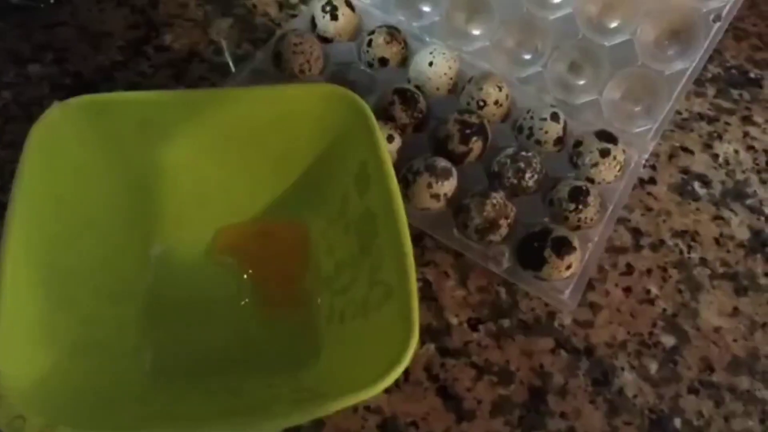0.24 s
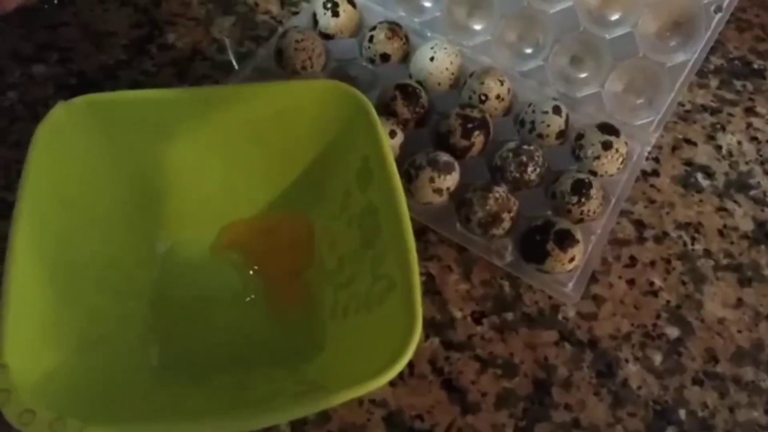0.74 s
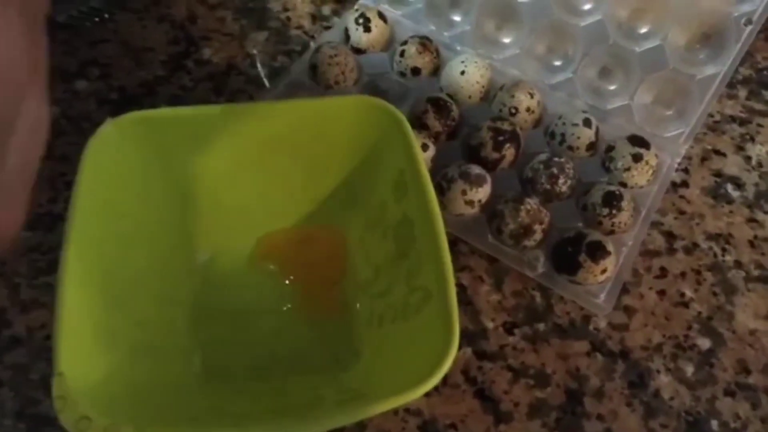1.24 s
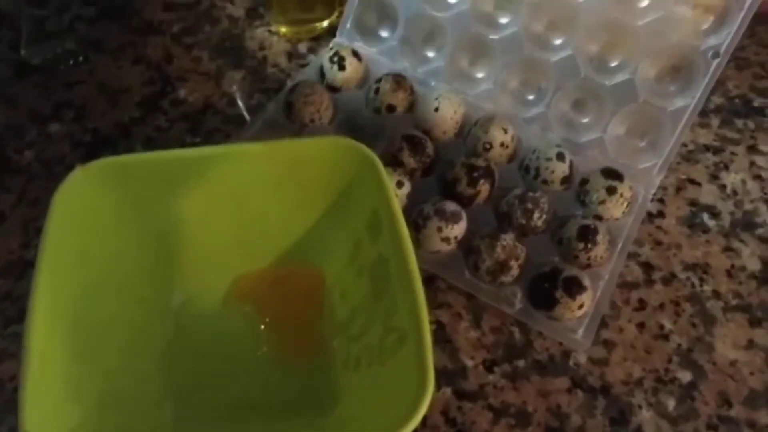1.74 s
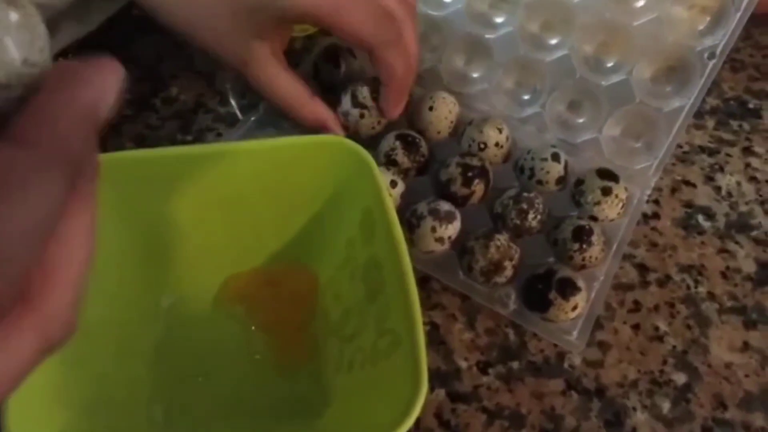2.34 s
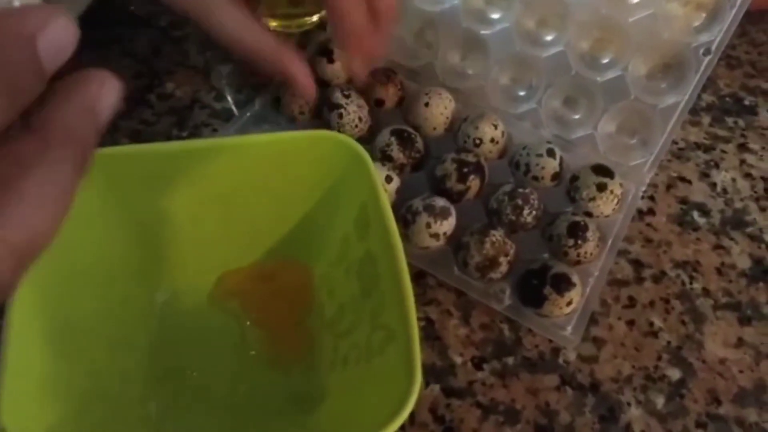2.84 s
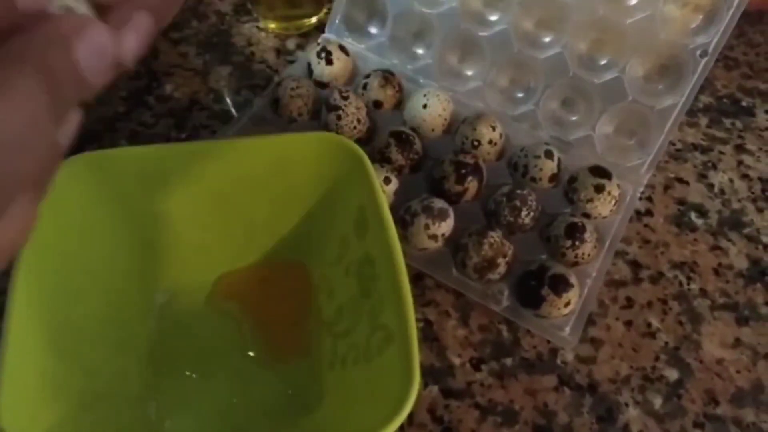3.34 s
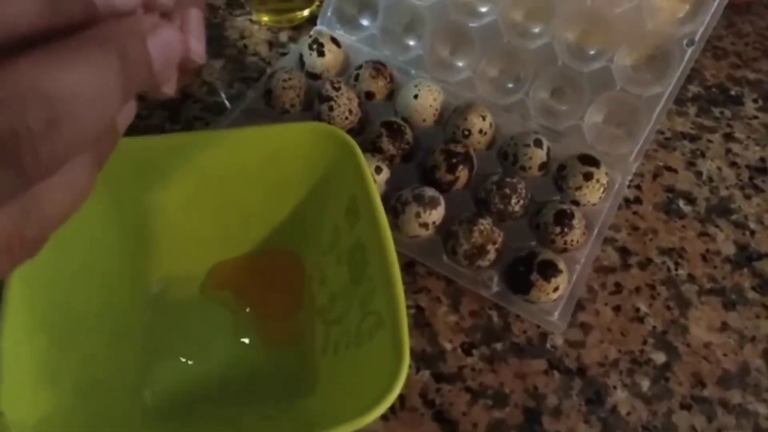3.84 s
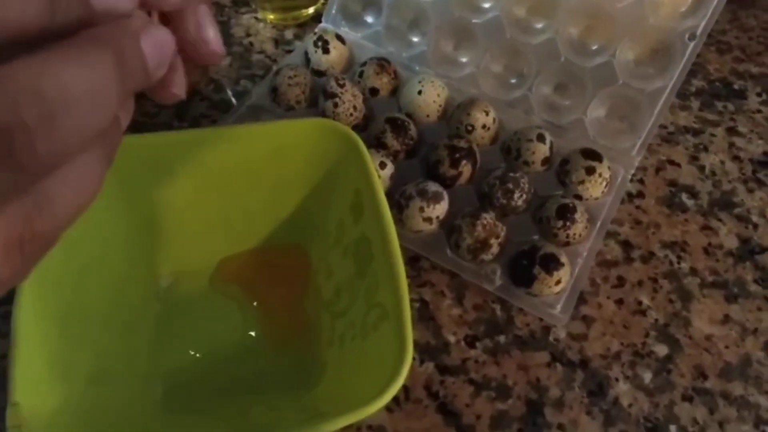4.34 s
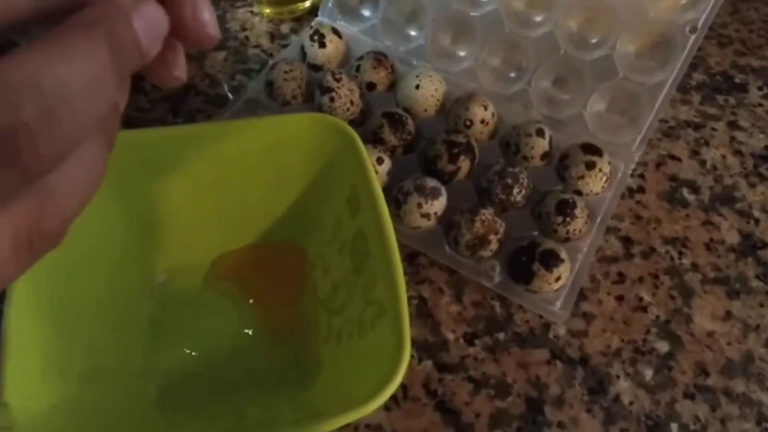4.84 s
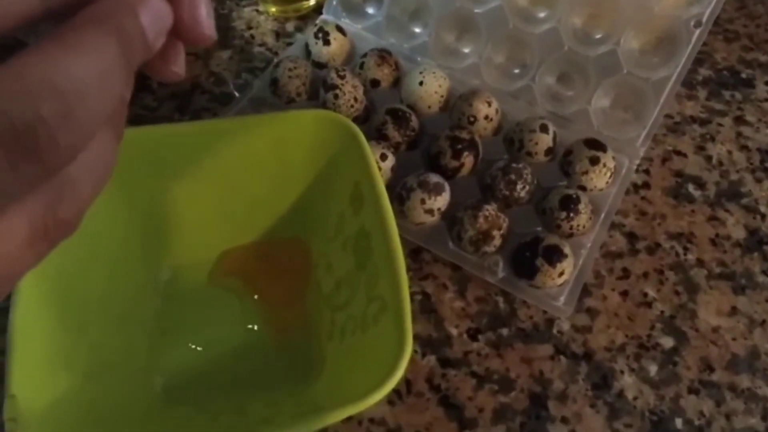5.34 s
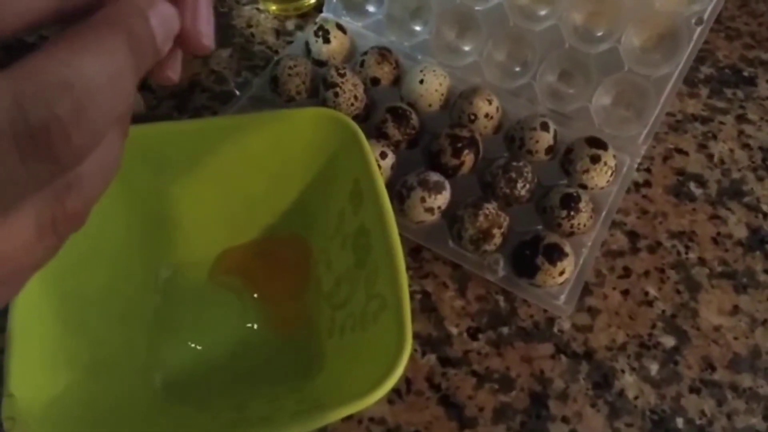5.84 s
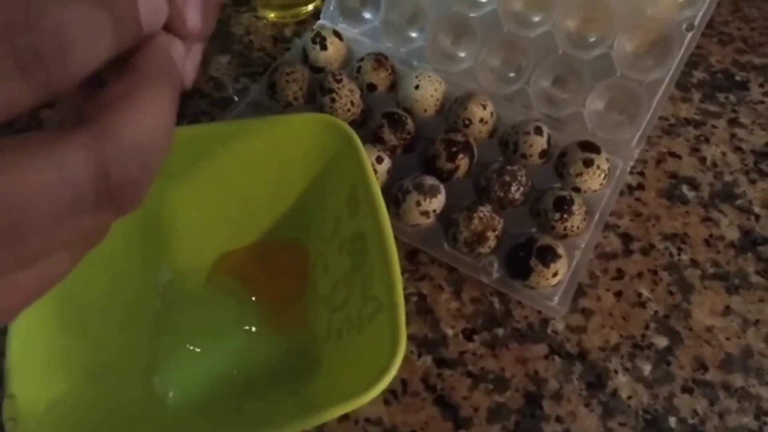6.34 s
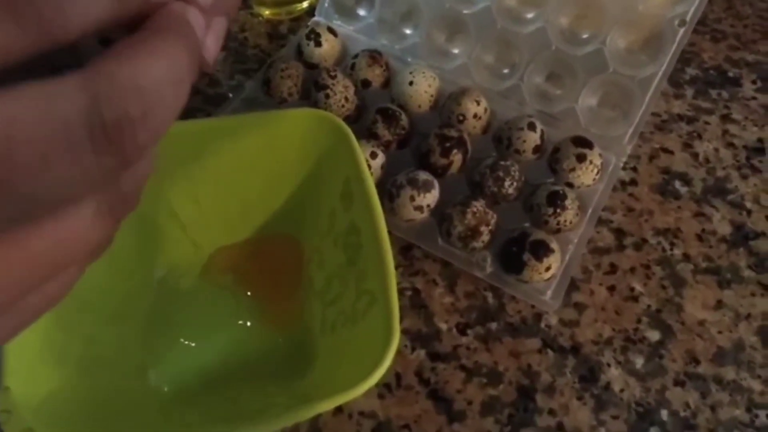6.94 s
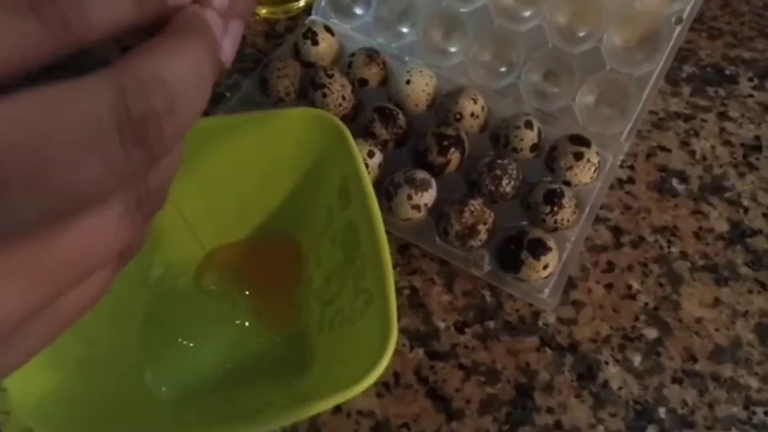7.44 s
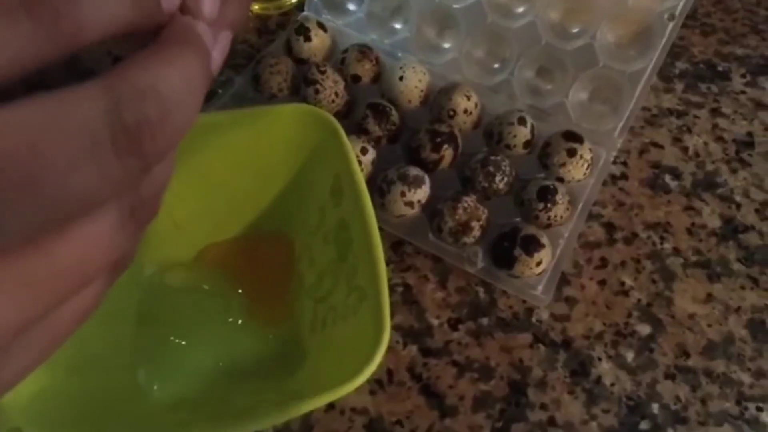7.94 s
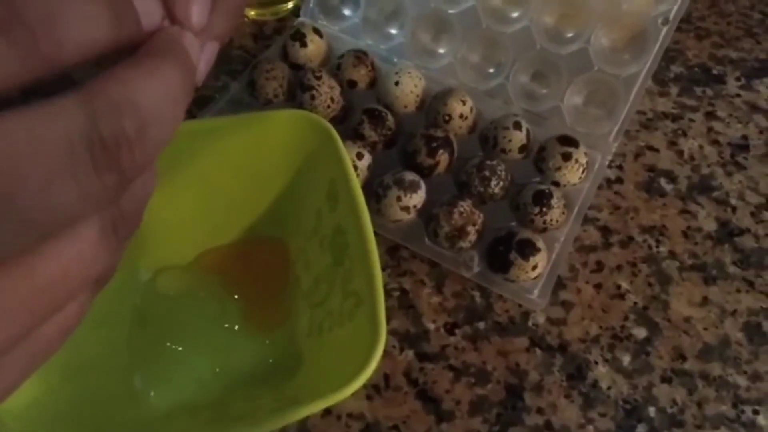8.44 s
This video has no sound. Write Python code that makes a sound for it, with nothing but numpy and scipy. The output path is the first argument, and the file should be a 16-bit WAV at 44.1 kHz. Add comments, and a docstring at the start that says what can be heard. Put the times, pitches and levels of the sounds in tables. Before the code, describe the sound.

Close plastic tray clatter and brittle eggshell ticks from hand-cracked little eggs, with caged birds twittering and chirping across a hard-walled kitchen.

```python
"""A hard-walled kitchen: small eggs are picked from a plastic tray and cracked by hand over a bowl.
Parakeets chatter off in the room: gliding three-partial notes in dense echo, over flickering twitter hiss.
Shells tick close by as short noise bursts; tray knocks drive resonant modes and noise bands.
Hands rumble on the microphone as low noise and rustle; a thin whistle, tonal swells, mains hum and
a noise floor lie underneath. A noise suppressor works on the whole."""
import sys
import numpy as np
from scipy import signal
from scipy.fft import rfft, irfft, next_fast_len
from scipy.io import wavfile
from scipy.ndimage import uniform_filter1d

SR = 44100
rng = np.random.default_rng(int(sys.argv[2]) if len(sys.argv) > 2 else 0)


def put_to_file(sound):
    """Save the sound as 16-bit audio at rate SR, in the file named by the first command-line argument."""
    columns = np.atleast_2d(sound).T  # one column per channel
    safe = np.clip(columns, -1, 1)
    whole_steps = np.round(safe * 32767)
    wavfile.write(sys.argv[1], SR, whole_steps.astype(np.int16))


N = 383669


def amp(db):
    """Decibels to gain."""
    return 10 ** (np.asarray(db) / 20)


def rms_one(x):
    """Scale to unit rms."""
    return x / np.sqrt(np.mean(x ** 2) + 1e-20)


def in_time(rows):
    """Table columns as sample-rate curves."""
    time_s, *columns = np.transpose(rows)
    return [np.interp(np.arange(N) / SR, time_s, column) for column in columns]


def at_hz(points, hz):
    """Read a spectrum on a log-frequency axis."""
    points_hz, values = np.transpose(points)
    return np.interp(np.log(hz + 1), np.log(points_hz), values)


def band(x, low_hz, high_hz, order=2):
    """Butterworth band-pass."""
    sos = signal.butter(order, [low_hz, min(high_hz, 20000)], "band", fs=SR, output="sos")
    return signal.sosfilt(sos, x)


def noise():
    """White noise over the whole scene."""
    return rng.standard_normal(N)


def drift(rate_hz):
    """Random wander, rms 1: noise through a double pole at rate_hz."""
    r = np.exp(-2 * np.pi * rate_hz / SR)
    wander = signal.lfilter([1], [1, -2 * r, r * r], rng.standard_normal(N + SR))
    return rms_one(wander[SR:])


def coloured(spectrum):
    """Steady noise with the given spectrum, rms 1."""
    size = next_fast_len(N)
    gain = amp(at_hz(spectrum, np.fft.rfftfreq(size, 1 / SR)))
    return rms_one(irfft(rfft(rng.standard_normal(size)) * gain, size)[:N])


def ring(drive, hz, t60_s):
    """Two-pole resonator: a unit click sets a decaying sine of height 1 ringing."""
    r, w = amp(-60 / (t60_s * SR)), 2 * np.pi * hz / SR
    return signal.lfilter([0, np.sin(w)], [1, -2 * r * np.cos(w), r * r], drive + 1e-18)


def add(out, time_s, sound):
    """Mix a short sound in at time_s."""
    at = round(time_s * SR)
    out[at:at + len(sound)] += sound[:N - at]


# Room decay: (frequency [Hz], t60 [s])
ROOM_DECAY = [(200, 0.15), (2500, 0.53), (5000, 0.46), (9000, 0.42), (13500, 0.39), (16000, 0.045)]


def room(x):
    """Diffuse echo: noise that dies band by band, unit energy."""
    t, edges_hz = np.arange(SR) / SR, np.geomspace(100, 18000, 13)
    tail = np.zeros(SR)
    for low_hz, high_hz in zip(edges_hz, edges_hz[1:]):
        t60_s = at_hz(ROOM_DECAY, np.sqrt(low_hz * high_hz))
        tail += band(rng.standard_normal(SR), low_hz, high_hz) * amp(-60 * t / t60_s)
    tail *= np.minimum(t / 0.0014, 1)   # first reflections need time to arrive
    return signal.fftconvolve(x, tail / np.sqrt(np.sum(tail ** 2)))[:N]


# Distant twitter: (time [s], level [dB], brightness [dB/octave])
FLOCK_LEVEL = [(0, -57.5, -1.5), (.45, -47, -5), (.62, -60.5, -8.5), (.69, -62, 1), (.76, -58.5, 1),
               (.85, -51.5, -11.5), (1.6, -47, 0.5), (1.85, -44, -1.3), (2.08, -51, -6.5),
               (2.5, -45.5, -5.5), (2.72, -47.5, -4), (2.95, -52, -7), (3.2, -49, -6), (3.5, -48.5, -1.5),
               (3.7, -96, 5), (3.8, -75, 11), (4.2, -43, -10.5), (4.9, -46.5, 0), (5.06, -94, 0.5),
               (6.9, -77, -7.5), (7.0, -51, -0.5), (8.1, -42.5, 0), (8.27, -51.5, -1), (8.7, -64, 26)]
# Twitter spectrum: (frequency [Hz], relative density [dB per Hz])
TWITTER_SPECTRUM = [(590, -34.5), (1000, -48), (1380, -14), (1830, -7), (2090, -4), (2440, 2), (2750, -1),
                    (3790, -2.5), (5380, 4.5), (6890, -7), (9000, -13.5), (11700, -72.5), (19800, -120)]


def flock():
    """Distant twitter blurred to hiss: flickering log-spaced bands, tilted about 3500 Hz by brightness."""
    level_db, bright_db_per_oct = in_time(FLOCK_LEVEL)
    hiss, edges_hz = coloured(TWITTER_SPECTRUM), np.geomspace(1100, 7300, 15)
    twitter = np.zeros(N)
    for low_hz, high_hz in zip(edges_hz, edges_hz[1:]):
        tilt_db = bright_db_per_oct * np.log2(low_hz / 3500)
        twitter += amp(1.3 * drift(7.6) + tilt_db) * band(hiss, low_hz, high_hz)
    air = amp(-26.5 + 3 * drift(8)) * rms_one(band(noise(), 12000, 14000, order=3))
    return amp(level_db) * (twitter + air)


# Whistle: (time [s], frequency [Hz], level [dB])
WHISTLE_PATH = [(0, 1047, -61), (.04, 1027, -74), (.085, 1167, -69), (.1, 1305, -62), (.14, 1330, -74),
                (.16, 1240, -60), (.25, 1222, -66), (.3, 1324, -83), (.4, 1304, -83)]
WHISTLE_ROOM_DB = 0.5


def whistle():
    """A faint sine that steps up and fades; fast pitch jitter makes it breathy."""
    hz, level_db = in_time(WHISTLE_PATH)
    fade = np.clip((WHISTLE_PATH[-1][0] - np.arange(N) / SR) / 0.021, 0, 1)
    jittered_hz = hz * (1 + 0.025 * drift(300))
    tone = np.sin(2 * np.pi * np.cumsum(jittered_hz) / SR)
    return amp(level_db + 2 * drift(30)) * tone * fade


# Grips on the microphone body: (time [s], hold [s], thump level [dB], rustle level [dB])
HAND_GRIPS = [(.48, 0.033, -76, -80), (0.869, 0.08, -58, -63), (1.622, 0.018, -81.5, -69.5),
              (1.9, 0.025, -64, -50.5), (2.406, 0.14, -67, -55.5), (3.388, 0.0077, -57, -76),
              (4.452, 0.18, -53, -59), (5.3, 0.015, -66.5, -80), (5.755, 0.14, -65, -72),
              (6.776, 0.021, -77, -83.5), (7, 0.35, -72, -90), (7.906, 0.057, -70, -80),
              (8.274, 0.24, -69, -74)]
# Low drone level: (time [s], level [dB])
DRONE_CURVE = [(0, -99), (1.02, -79.5), (2.32, -92), (2.52, -65), (2.85, -96.5), (5.6, -88.5), (5.82, -64),
               (6.08, -93), (6.6, -84), (7.0, -63), (7.36, -62.5), (7.73, -56), (7.92, -63.5),
               (8.31, -62.5), (8.53, -78), (8.7, -64.5)]
# Drone noise bands: (centre [Hz], width [Hz], relative level [dB])
DRONE_BANDS = [(102, 13, -6), (137, 12, 1.5), (179.5, 16, 0.5), (251.2, 35, -10.5)]
GRIP_RISE_DB_PER_S, GRIP_FALL_DB_PER_S = 302.5, 134
THUMP_REST_DB, RUSTLE_REST_DB = -82.5, -83


def hands():
    """Each grip rises, holds and falls as low thump and patchy rustle noise; a wavering drone runs beside."""
    t, thump_db, rustle_db = np.arange(N) / SR, THUMP_REST_DB, RUSTLE_REST_DB
    for time_s, hold_s, grip_thump_db, grip_rustle_db in HAND_GRIPS:
        rise_db = GRIP_RISE_DB_PER_S * np.maximum(time_s - t, 0)
        fall_db = GRIP_FALL_DB_PER_S * np.maximum(t - time_s - hold_s, 0)
        thump_db = np.maximum(thump_db, grip_thump_db - rise_db - fall_db)
        rustle_db = np.maximum(rustle_db, grip_rustle_db - rise_db - fall_db)
    thump = amp(thump_db + 0.5 * drift(13)) * rms_one(band(noise(), 36, 110))

    drone_db, = in_time(DRONE_CURVE)
    drone = np.zeros(N)
    for hz, width_hz, db in DRONE_BANDS:
        drone += amp(db + 2.5 * drift(2.3)) * band(noise(), hz - width_hz / 2, hz + width_hz / 2)

    edges_hz = np.geomspace(340, 1500, 11)
    rustle = np.zeros(N)
    for low_hz, high_hz in zip(edges_hz, edges_hz[1:]):
        rustle += amp(5 * drift(13)) * band(noise(), low_hz, high_hz)
    return thump + amp(drone_db) * rms_one(drone) + amp(rustle_db) * rms_one(rustle)


# Mains overtone: (frequency [Hz], level [dB rms])
HUM_TONES = [(300, -76)]


def hum():
    """A mains overtone: a sine whose level barely wavers."""
    t, out = np.arange(N) / SR, np.zeros(N)
    for hz, level_db in HUM_TONES:
        out += amp(level_db + 0.4 * drift(3)) * np.sqrt(2) * np.sin(2 * np.pi * hz * t)
    return out


# Noise floor spectrum: (frequency [Hz], relative density [dB per Hz])
FLOOR_SPECTRUM = [(30, -14), (100, -15), (250, -9.5), (500, -15.5), (2000, -21), (6000, -23.5),
                  (14000, -17.5), (16000, -22)]
FLOOR_RMS_DB = -77.5


def noise_floor():
    """Steady coloured noise."""
    return amp(FLOOR_RMS_DB) * coloured(FLOOR_SPECTRUM)


# Faint tonal swells: (time [s], length [s], centre [Hz], level [dB])
TONE_SWELLS = [(0.148, 0.28, 357, -69.5), (1.193, 0.25, 777, -70.5), (2.712, 0.14, 1357, -57.5),
               (2.764, 0.17, 1620, -61), (5.745, 0.33, 350, -63.5), (5.749, 0.31, 252, -60.5),
               (2.409, 0.19, 231, -62), (5.852, 0.16, 1360, -65.5), (6.256, 0.47, 598, -78),
               (6.286, 0.25, 348, -75.5), (6.676, 0.18, 900, -76), (6.664, 0.23, 352, -72),
               (6.972, 0.34, 716, -75.5), (7.812, 0.15, 985, -71), (7.98, 0.18, 380, -68),
               (8.2, 0.2, 710, -66.5), (8.3, 0.098, 476, -70), (8.497, 0.19, 614, -74)]


def swells():
    """Narrow noise bands that fade in and out."""
    out = np.zeros(N)
    for time_s, length_s, hz, level_db in TONE_SWELLS:
        settled = band(rng.standard_normal(SR), 0.95 * hz, 1.05 * hz)
        tone = settled[SR - round(length_s * SR):]
        add(out, time_s, amp(level_db) * rms_one(tone) * np.sqrt(np.hanning(len(tone))))
    return out


# Parakeet notes: (time [s], length [s], start [Hz], end [Hz], rasp [0-1],
#                  fundamental level [dB], octave level [dB])
BIRD_NOTES = [(0.245, 0.061, 2707, 2593, 0.13, -56, -47), (0.382, 0.078, 3040, 2810, 0.08, -65, -51.5),
              (0.388, 0.057, 4000, 3960, 0.09, -53, -72), (0.706, 0.077, 4020, 3670, 0.09, -54, -103),
              (0.773, 0.09, 3320, 2300, 0.19, -54.5, -88), (0.962, 0.073, 3950, 3920, 0.07, -55, -75),
              (1.024, 0.05, 4550, 4690, 0.08, -45, -73), (1.088, 0.073, 4343, 4060, 0.06, -41.5, -57.5),
              (1.23, 0.085, 2630, 2630, 0.08, -71, -58.5), (1.392, 0.028, 4080, 3840, 0, -52.5, -87),
              (2.529, 0.049, 3090, 2954, 0.07, -57.5, -52.5), (2.953, 0.053, 3650, 3580, 0.09, -51, -68),
              (3.023, 0.085, 2393, 2293, 0.11, -54, -69), (3.077, 0.1, 2910, 2850, 0.1, -55.5, -43.5),
              (3.087, 0.093, 3917, 3590, 0.19, -47, -58), (3.277, 0.046, 4120, 4230, 0.02, -47, -64),
              (3.3, 0.054, 2458, 2400, 0.09, -52.5, -80), (3.321, 0.11, 3265, 3200, 0.07, -54.5, -72),
              (3.409, 0.065, 4530, 4450, 0.09, -48.5, -89), (3.503, 0.065, 3210, 3335, 0.08, -52, -83),
              (3.515, 0.052, 2730, 2650, 0.04, -56.5, -84), (3.574, 0.07, 3593, 3493, 0.06, -53, -96),
              (3.63, 0.026, 2170, 2140, 0, -56, -92), (3.723, 0.065, 4290, 3964, 0.1, -49.5, -75),
              (3.739, 0.084, 2250, 2110, 0.06, -55, -78), (3.781, 0.067, 3280, 3220, 0.05, -47.5, -59),
              (3.81, 0.046, 2846, 2636, 0.04, -46.5, -68), (3.855, 0.075, 2706, 2802, 0.23, -50, -46.5),
              (4.16, 0.082, 2927, 3260, 0.13, -48, -31), (4.274, 0.065, 2943, 2714, 0.22, -61, -31.5),
              (4.38, 0.079, 2170, 2183, 0.05, -49, -34.5), (4.443, 0.042, 2240, 2223, 0.21, -55, -27),
              (4.57, 0.16, 2288, 2167, 0.15, -47, -34), (5.082, 0.051, 4710, 4550, 0, -52.5, -78),
              (5.109, 0.043, 3640, 3170, 0.15, -53, -81), (5.079, 0.056, 4300, 4190, 0.06, -53, -76),
              (5.14, 0.076, 3216, 3110, 0.04, -50.5, -86), (5.17, 0.06, 2558, 2376, 0.07, -50.5, -81),
              (5.614, 0.095, 2846, 2786, 0.19, -53.5, -42.5), (5.724, 0.079, 4240, 4100, 0.11, -45.5, -67),
              (5.797, 0.0813, 2690, 3190, 0.16, -43, -52), (5.747, 0.052, 2103, 2030, 0.15, -48, -67),
              (5.836, 0.071, 2350, 2462, 0.18, -55.5, -34), (6.172, 0.08, 2710, 2310, 0.12, -53, -50),
              (6.224, 0.049, 3318, 2952, 0.15, -43.5, -58.5), (6.735, 0.039, 2585, 2475, 0.07, -61, -72),
              (6.847, 0.015, 2080, 2060, 0, -63.5, -75), (6.918, 0.079, 2583, 2430, 0.09, -53, -47.5),
              (7.015, 0.079, 2880, 2850, 0.11, -47.5, -52), (7.045, 0.067, 2002, 1874, 0.09, -47, -64),
              (7.124, 0.072, 2490, 2034, 0.13, -42, -51), (7.191, 0.1, 3162, 3300, 0.06, -48, -69),
              (7.277, 0.082, 3500, 3315, 0.02, -52, -79), (7.376, 0.05, 2650, 2670, 0.02, -46.5, -41),
              (8.294, 0.067, 2416, 2896, 0.08, -72, -35), (8.302, 0.056, 2726, 2693, 0, -46.5, -28.5),
              (8.362, 0.11, 2734, 2506, 0.16, -50, -32), (8.472, 0.088, 2830, 2856, 0.14, -49.5, -29.5),
              (8.565, 0.061, 2540, 2430, 0.09, -51, -32.5), (8.599, 0.087, 2826, 2812, 0.03, -44.5, -31.5)]
BIRD_DIRECT_DB, BIRD_ROOM_DB = 1.5, 4.5
THIRD_DB = -15.5   # third partial re octave
NOTE_ATTACK_S, NOTE_RELEASE_S = 0.012, 0.032
BREATH_DB, BIRD_AIR_DB = -15, -28.5   # re call loudness


def parakeets():
    """Gliding notes of three partials; fast pitch flutter spreads them into a rasp; strong echo, hiss on top."""
    calls, flutter = np.zeros(N), drift(426)
    for time_s, length_s, start_hz, end_hz, rasp, first_db, octave_db in BIRD_NOTES:
        at = round(time_s * SR)
        t = np.arange(min(round(length_s * SR), N - at)) / SR
        glide_hz = np.interp(t, [0, length_s], [start_hz, end_hz])
        phase = 2 * np.pi * np.cumsum(glide_hz * (1 + rasp * flutter[at:at + len(t)])) / SR
        partials_db = [first_db, octave_db, octave_db + THIRD_DB]
        tone = sum(amp(db) * np.sin(k * phase) for k, db in enumerate(partials_db, 1))
        envelope = np.minimum(t / NOTE_ATTACK_S, (length_s - t) / NOTE_RELEASE_S)
        add(calls, time_s, tone * np.clip(envelope, 0, 1))
    calls = band(calls, 1934, 9400, order=4)
    heard = amp(BIRD_DIRECT_DB) * calls + amp(BIRD_ROOM_DB) * room(calls)

    loudness = np.sqrt(np.abs(uniform_filter1d(heard ** 2, size=800)))
    edges_hz = np.geomspace(8800, 14300, 9)
    air = np.zeros(N)
    for low_hz, high_hz in zip(edges_hz, edges_hz[1:]):
        air += amp(4.5 * drift(15)) * band(noise(), low_hz, high_hz)
    breath = amp(BREATH_DB) * coloured(TWITTER_SPECTRUM)
    return heard + loudness * (amp(BIRD_AIR_DB) * rms_one(air) + breath)


# Tray and bowl knocks: (time [s], overall level [dB], ring [dB], crunch [dB], snap [dB], treble [dB],
#                        body [dB], body frequency [Hz], rattle t60 [s])
TRAY_KNOCKS = [(0.26, -30.5, -22, -32, -0.5, -25, -19, 680, 0.021),
               (0.8576, -8.5, -23.5, 1, 6.5, 6, -30, 245, 0.041),
               (0.874, -14.5, -28, -4, 3.5, 0, -36, 250, 0.012),
               (0.923, -28.5, -19, -8, -21, -24, -11, 2200, 0.013),
               (0.996, -38.5, -18, 3, 1, -1, -39, 600, 0.032), (1.569, -41, -6, 0, 8, 6, -27, 696, 0.031),
               (1.854, -21, -15.5, -4.5, -6, -18, -8.5, 733, 0.027),
               (1.864, -27.5, -15.5, -5, -1, -11, -30, 248, 0.05),
               (1.891, -16, -15.5, -6, -1.5, -20.5, -15, 570, 0.02),
               (1.9, -25, -19, -3.5, -1, -9.5, -20, 620, 0.1),
               (1.912, -29.5, -13, -1.5, -6, -15, -16, 2000, .06),
               (1.924, -32.5, -20, -2.5, -0.5, -6.5, -16, 250, 0.11),
               (1.951, -31.5, -12.5, -0.5, -5, -14, -24, 560, 0.05),
               (1.996, -29, -12.5, -6, -10, -47, -11.5, 1090, 0.02),
               (2.055, -43, -12, -3, -8.5, -40, -25.5, 700, 0.05),
               (2.086, -42, -15, -4.5, -8, -40, -36.5, 696, 0.02),
               (2.11, -35, -17, -3.5, -8.5, -39.5, -15.5, 770, 0.06),
               (2.119, -36, -9.5, -4, -15, -40.5, -11, 2150, 0.07),
               (2.242, -10.5, -17.5, -7, -17.5, -26, -23.5, 760, 0.024),
               (2.326, -33, -13, -3.5, -5, -34, -10, 710, 0.22),
               (2.338, -26.5, -15.5, -0.5, -4, -34.5, -17, 720, .1),
               (2.346, -15, -12, -4, -13, -28.5, -14.5, 670, 0.064),
               (2.353, -20, -16, -2, -2, -18, -12.5, 2140, 0.045),
               (2.373, -17, -7, -4.5, -4.5, -25, -7.5, 1620, 0.05),
               (2.377, -9.5, -19, -5, -3, -9.5, -13.5, 608, 0.068),
               (2.383, -13, -18, -11.5, -11, -33, -13.5, 570, 0.044),
               (2.388, -17, -11, -6.5, -9.5, -24.5, -14.5, 230, 0.05),
               (2.403, -27.5, -11.5, 1.5, 2.5, -15, -14, 800, 0.14),
               (2.425, -30.5, -10.5, -9, -10, -11.5, -11.5, 480, 0.23)]
# Tray modes: (frequency [Hz], level [dB], t60 [s])
TRAY_MODES = [(738, 1, 0.047), (1060, -0.5, .03), (1620, -0.5, 0.04), (2186, 3.5, 0.032)]
KNOCK_RISE_S, BODY_T60_S = 0.002445, 0.022
STRIKE_DB, RATTLE_UNEVEN_DB = 6, 4   # strike re rattle; rms lumpiness of rattle
MODE_SPREAD_DB, LOW_RATTLE_DB = 2.0, -10
KNOCK_ROOM_DB = -14.5


def knocks():
    """A strike and grainy rattle drive tray modes and a hollow body; noise bands crunch, snap and add treble."""
    out, t = np.zeros(N), np.arange(9000) / SR
    for time_s, level_db, ring_db, crunch_db, snap_db, treble_db, body_db, body_hz, t60_s in TRAY_KNOCKS:
        grit = rng.standard_normal(len(t))
        lumps_db = RATTLE_UNEVEN_DB * rms_one(uniform_filter1d(np.roll(grit, 4500), size=60))
        rattle = grit * amp(lumps_db - 60 * t / t60_s) * np.minimum(t / KNOCK_RISE_S, 1)
        strike = amp(STRIKE_DB) * np.exp(-((t - KNOCK_RISE_S) / 0.0001) ** 2)
        struck = rattle + strike

        modes = np.zeros(len(t))
        for hz, db, ring_s in TRAY_MODES:
            modes += amp(db + rng.normal(0, MODE_SPREAD_DB)) * ring(struck, hz, ring_s)
        body = band(ring(struck, body_hz, BODY_T60_S), 0.6 * body_hz, 1.6 * body_hz)
        parts = [
            (ring_db, band(modes, 550, 6000, order=3)),
            (body_db, body),
            (LOW_RATTLE_DB, band(rattle, 900, 2900, order=3)),
            (crunch_db, band(rattle, 2400, 5000, order=3)),
            (snap_db, band(rattle, 4300, 7800, order=3)),
            (treble_db, band(rattle, 6800, 13000, order=3)),
        ]
        knock = sum(amp(db) * part / np.abs(part).max() for db, part in parts)
        add(out, time_s, amp(level_db) * knock)
    return out


# Shell cracks: (time [s], snap peak [dB], length [s], relative body gain [dB])
SHELL_CRACKS = [(2.859, -35.5, 0.0077, -5), (2.88, -24.5, 0.0046, -18), (2.8865, -28, 0.01, -2.5),
                (3.009, -29, 0.0061, -5.5), (3.056, -39, 0.0022, 3), (3.404, -52, 0.0033, -20),
                (3.444, -54, 0.0046, -20.5), (3.492, -44, 0.0029, -11), (3.84, -32, 0.0032, -33),
                (3.918, -18, 0.006, -7.5), (3.923, -29, 0.011, -6), (3.952, -20, 0.0014, -26),
                (3.962, -25.5, 0.0033, -2), (4.02, -27, 0.0047, -7), (4.9647, -22.5, 0.005, -8),
                (5.008, -34, 0.006, -6.5), (5.2474, -28, 0.0078, -11), (5.316, -44, 0.0023, -4),
                (5.588, -47, 0.0047, -19), (6.497, -56, 0.018, -9), (6.617, -60, 0.0046, -30),
                (6.6364, -25.5, 0.0053, -14), (6.6413, -40, 0.0035, -13), (6.6974, -29, 0.0056, -17),
                (6.794, -25.5, 0.0068, -34), (7.051, -24, 0.019, -6), (7.072, -32, 0.0061, -25),
                (7.081, -22, 0.0071, -18), (7.092, -20.5, 0.013, -16), (7.104, -26, 0.0095, -13.5),
                (7.121, -18, 0.0039, -25), (7.185, -27, 0.005, -18), (7.282, -35.5, 0.0022, -23),
                (7.495, -30, 0.0017, -12), (7.499, -34, 0.0016, -23), (7.505, -20, 0.0058, -3),
                (7.577, -20, 0.008, -36), (7.637, -18.5, 0.0051, -32), (7.59, -37, .005, -30),
                (7.7147, -28, 0.0063, -15), (7.756, -29.5, 0.0038, -27), (7.793, -28.5, 0.0046, -28),
                (7.8234, -30, 0.015, -28), (7.839, -26.5, 0.0052, -7), (7.842, -30, 0.0053, -9),
                (8.0074, -22, 0.0055, -35), (8.011, -17.5, 0.0064, -18), (8.025, -32, .006, -26),
                (8.044, -25.5, 0.0044, -32), (8.256, -47, 0.0022, -20)]
SHELL_HZ, SHELL_SPREAD = 6510, 0.04   # mean piece pitch; relative spread
GRIT_DB, SCATTER_DB, SCATTER_T60_S = -6.5, -16, 0.045
SHORTEST_SNAP_S = 0.0005
CRACK_ROOM_DB, CRACK_SHEEN_DB = -15.5, -16   # sheen: hard walls return the top more strongly


def cracks():
    """Each snap is a short noise burst, then a fast-fading scatter of early echoes off the counter.

    Both pass through a shell-pitch band, a bright grit band and a duller body band."""
    out, t = np.zeros(N), np.arange(2500) / SR
    for time_s, peak_db, length_s, body_db in SHELL_CRACKS:
        hz = SHELL_HZ * (1 + SHELL_SPREAD * rng.standard_normal())
        centre_s, width_s = length_s / 2, SHORTEST_SNAP_S + 0.1 * length_s
        fracture = np.exp(-((t - centre_s) / width_s) ** 2)   # spreads, then stops
        early_echoes = amp(SCATTER_DB - 60 * t / SCATTER_T60_S) * (t > centre_s)
        burst = rng.standard_normal(len(t)) * (fracture + early_echoes)
        piece = band(burst, 0.87 * hz, 1.13 * hz)
        snap = piece + amp(GRIT_DB) * band(burst, 3800, 15500, order=4)
        body = amp(body_db) * band(burst, 1700, 4000, order=3)
        add(out, time_s, amp(peak_db) * (snap + body) / np.abs(snap).max())
    return out


def scene():
    """Near blows get a little room, the birds and the whistle a lot."""
    tone, tray, shell = whistle(), knocks(), cracks()
    to_room = amp(WHISTLE_ROOM_DB) * tone + amp(KNOCK_ROOM_DB) * tray
    to_room += amp(CRACK_ROOM_DB) * shell + amp(CRACK_SHEEN_DB) * band(shell, 8040, 20000)
    near = tone + tray + shell + room(to_room)
    mix = near + flock() + hands() + hum() + noise_floor() + swells() + parakeets()
    return mix[None]


# Suppressor threshold: (frequency [Hz], level [dB per bin])
SUPPRESS_THRESHOLD = [(30, -112), (300, -106), (1000, -100), (4000, -105), (9000, -106), (16000, -100)]
SUPPRESS_FLOOR_DB, CUTOFF_HZ = -10, 16300


def record(dry):
    """A noise suppressor ducks every frequency bin that sinks towards its threshold; the top is cut."""
    miked = band(dry, 83.7, 8240)   # small microphone rolls off at both ends
    hz, _, bins = signal.stft(miked, SR, nperseg=1024, boundary="even")
    power = uniform_filter1d(np.abs(bins) ** 2, size=3, axis=-1) + 1e-20
    threshold_power = amp(at_hz(SUPPRESS_THRESHOLD, hz))[:, None] ** 2
    gain = np.clip(1 - threshold_power / power, amp(SUPPRESS_FLOOR_DB), 1)
    clean = signal.istft(bins * gain, SR, nperseg=1024)[1][:, :N]
    return signal.sosfilt(signal.cheby2(12, 70, CUTOFF_HZ, fs=SR, output="sos"), clean)


dry = scene()
out = record(dry)
put_to_file(out)
```